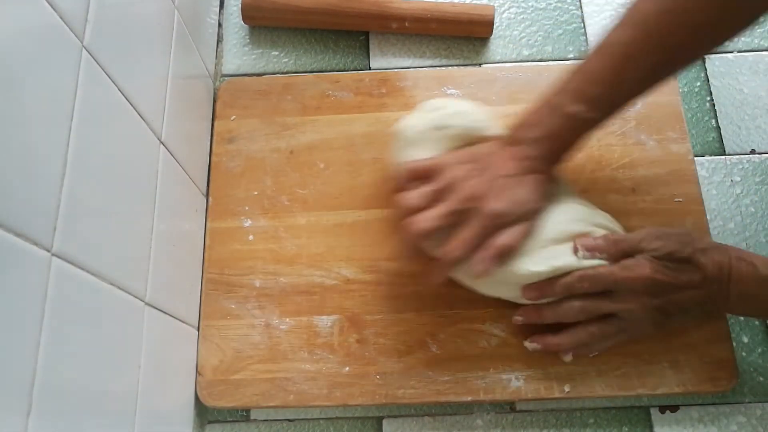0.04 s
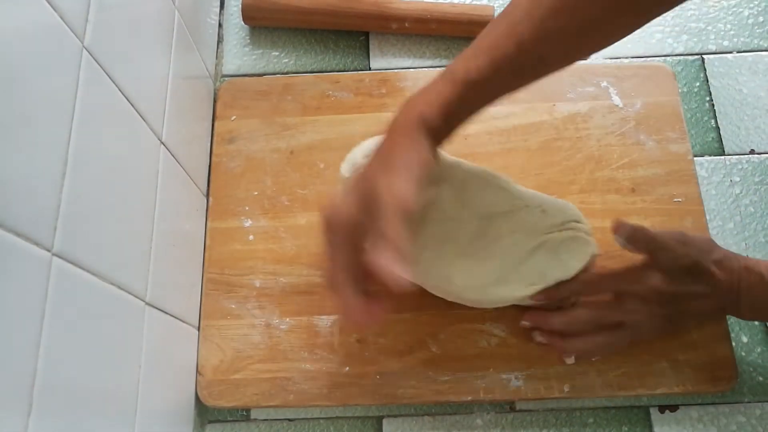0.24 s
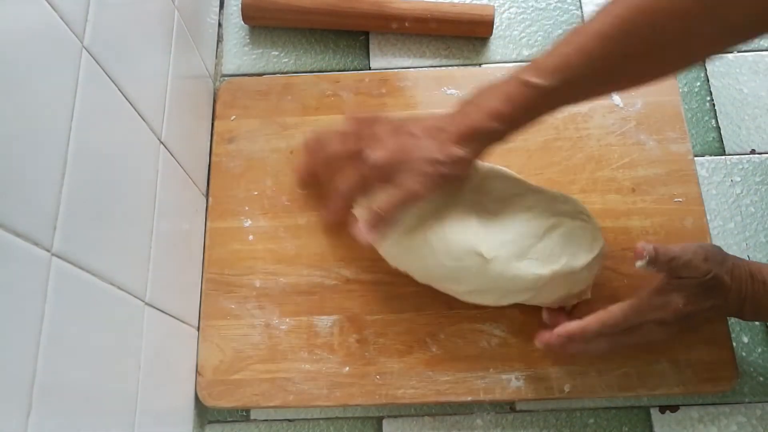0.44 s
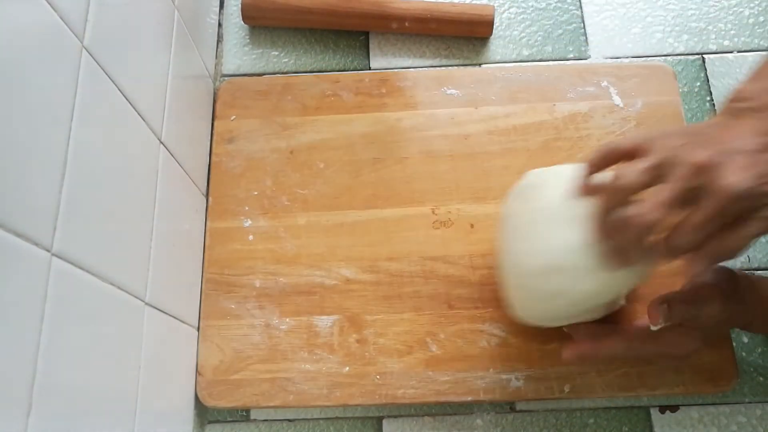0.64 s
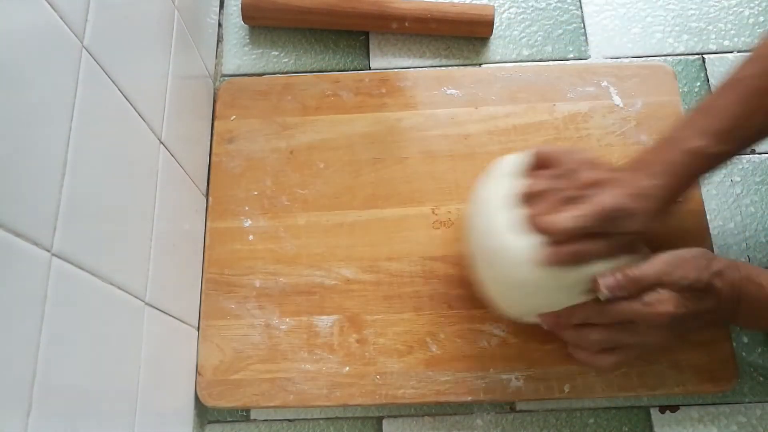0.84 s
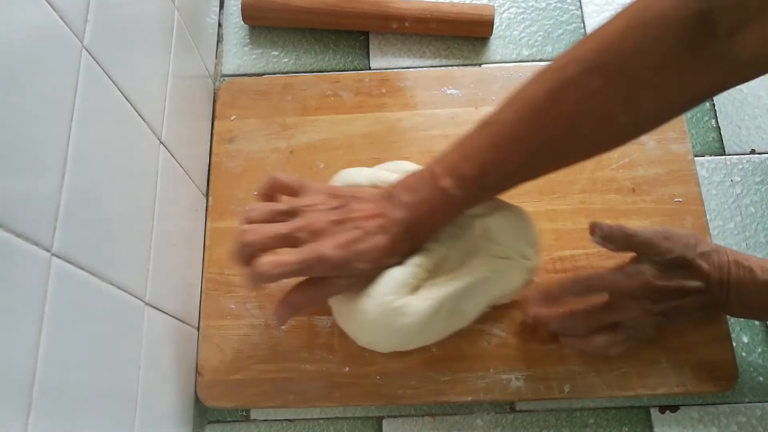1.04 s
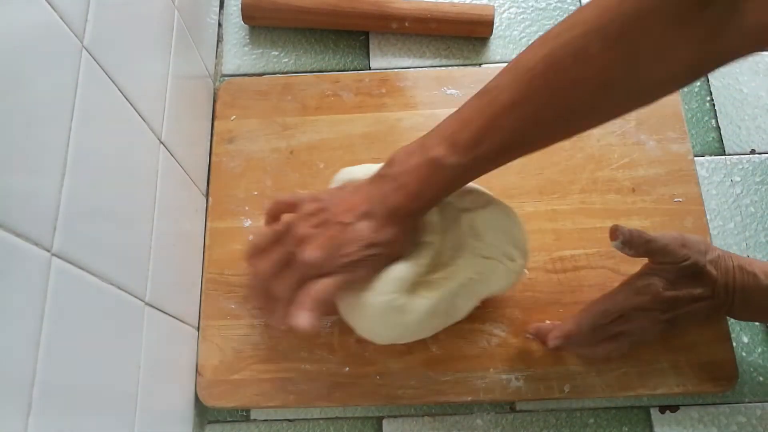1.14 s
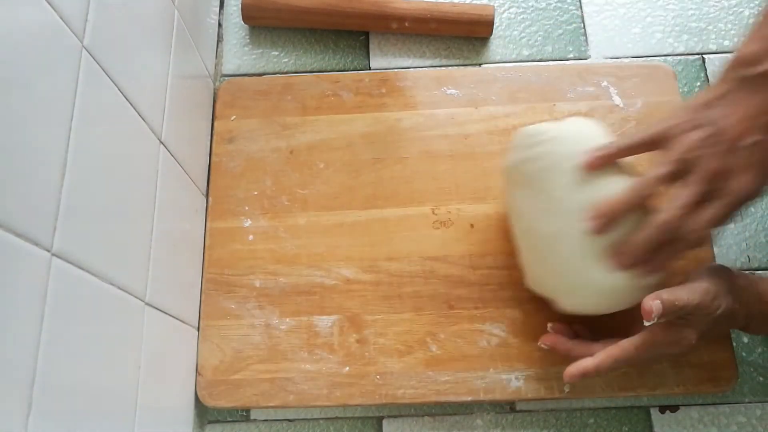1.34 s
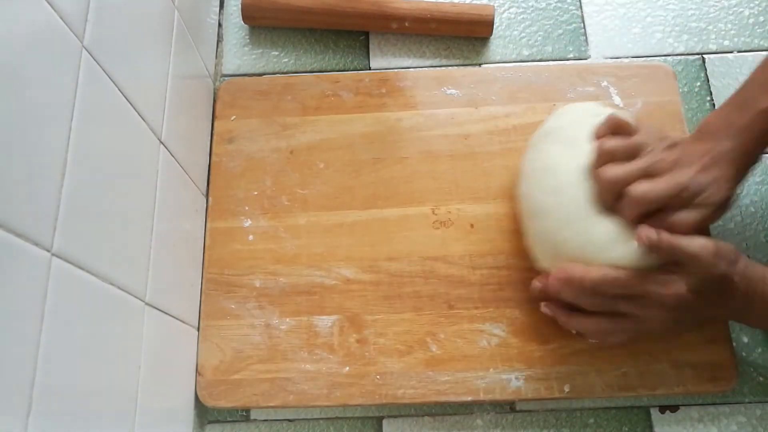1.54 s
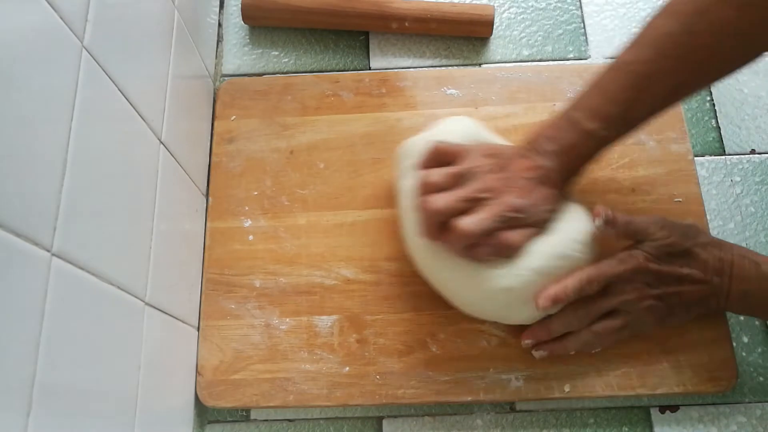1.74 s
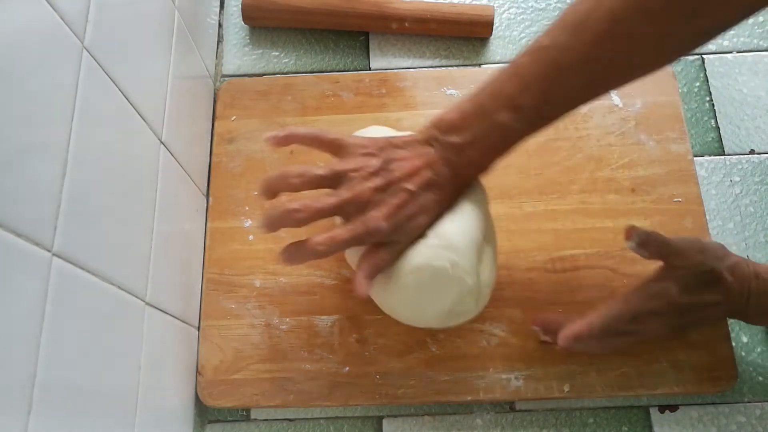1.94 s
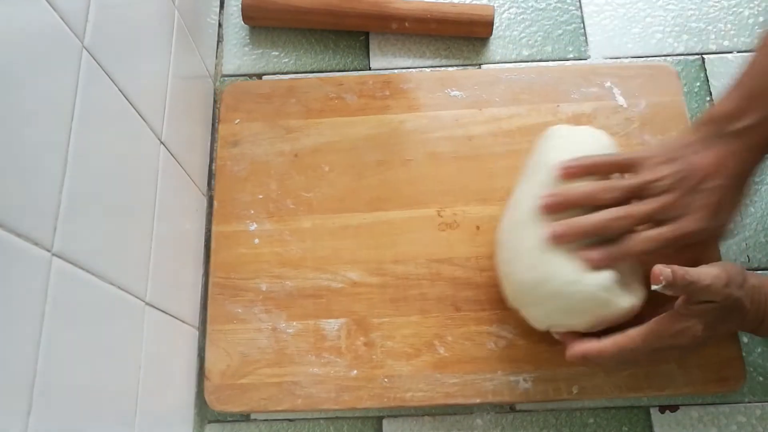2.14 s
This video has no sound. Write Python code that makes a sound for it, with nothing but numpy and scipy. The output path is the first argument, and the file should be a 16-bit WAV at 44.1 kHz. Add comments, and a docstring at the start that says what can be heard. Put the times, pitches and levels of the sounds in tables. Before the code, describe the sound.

Hands knead dough on a loose wooden board, with soft thumps and floury rubbing. The board knocks several times on the tiled worktop, then again a little later, before quiet kneading continues. Close microphones in a small kitchen.

```python
"""A small kitchen, close stereo microphones: hands knead dough on a loose wooden board by a tiled wall.
Over still air the board scrapes, a palm brushes it, and the dough thumps softly and hisses on the flour.
From 0.2 s a push rocks the board so that it knocks on the tiled worktop, and the room rings briefly.
A finger comes unstuck near 0.9 s, and near 1.2 s the board knocks again.
Quiet kneading goes on, ending in a faint rising squeak and a last scrape."""
import sys
import numpy as np
from scipy import signal
from scipy.fft import rfft, irfft
from scipy.io import wavfile

SR = 44100
rng = np.random.default_rng(int(sys.argv[2]) if len(sys.argv) > 2 else 0)


def file_out(sig):
    """Save sig as 16-bit WAV at sys.argv[1]."""
    # one column per channel
    cols = np.atleast_2d(sig).T
    # limit, then scale
    lim = np.clip(cols, -1, 1)
    pcm = np.round(lim * 32767).astype(np.int16)
    wavfile.write(sys.argv[1], SR, pcm)


N = 97020
TIME = np.arange(N) / SR


def from_db(db):
    """Decibels to gain."""
    return 10 ** (np.asarray(db) / 20)


def rms_one(x):
    """Scale to rms 1."""
    return x / np.sqrt(np.mean(x ** 2) + 1e-20)


def pan(db):
    """Gains at the two microphones; pan is left minus right in dB."""
    return from_db(np.array([[db], [-db]]) / 2)


def at_hz(points, hz):
    """Read a table on a log-frequency axis."""
    f, values = np.transpose(points)
    return np.interp(np.log(hz), np.log(f), values)


def band(x, low, high, order=2):
    """Butterworth band-pass, edges in Hz."""
    sos = signal.butter(order, [low, min(high, .49 * SR)], "band", fs=SR, output="sos")
    return signal.sosfilt(sos, x + 1e-18)


def convolve(x, response):
    """Pass a sound through an impulse response."""
    return signal.fftconvolve(np.atleast_2d(x), np.atleast_2d(response), axes=-1)[:, :N]


def click(s):
    """A unit impulse at s seconds."""
    return 1. * (np.arange(N) == int(s * SR))


def ring(hz, t60, lag=0):
    """One dying mode."""
    age = np.maximum(TIME - lag, 0)
    return np.sin(2 * np.pi * hz * age) * from_db(-60 * age / t60)


def hiss(spectrum):
    """Fine friction noise, unrelated in the two channels; rms 1."""
    hz = np.maximum(np.arange(N // 2 + 1) * SR / N, 1)
    coloured = irfft(rfft(rng.standard_normal((2, N))) * from_db(at_hz(spectrum, hz)), N)
    return rms_one(band(coloured, 1200, 20000))


def resonate(x, modes):
    """Drive broad resonances in parallel; rms 1."""
    return rms_one(sum(from_db(db) * rms_one(band(x, hz - width / 2, hz + width / 2))
                       for hz, width, db in modes))


def swell(s, rise, fall, db, pan_db=0):
    """Stereo bell-shaped envelope of one hand movement."""
    width = np.where(TIME < s, rise, fall)
    return from_db(db) * pan(pan_db) * np.exp(-.5 * ((TIME - s) / width) ** 2)


def strokes(rows):
    """Joint envelope of several movements."""
    return np.sqrt(sum(swell(*row) ** 2 for row in rows))


# Likeness of the room's sound at the two microphones: f/Hz, likeness/0-1
MIC_LIKENESS = [(60, .999), (130, 0.94), (260, 0.9), (500, 0), (1000, 0.7), (2000, 0.19), (4000, 0),
                (12000, 0.048)]
# Its lean, mostly to the right: f/Hz, pan/dB
ROOM_LEAN = [(100, -0.5), (260, 1), (500, -4.5), (1200, -1.5), (4000, -1.5), (8500, -13.5), (15000, -14)]
def diffuse_bands():
    """Third-octave bands of noise from all round the room, alike in the bass, unrelated in the treble."""
    edges = 22 * 2 ** (np.arange(30) / 3)
    white = rng.standard_normal((2, 2, N))
    for k, (low, high) in enumerate(zip(edges, edges[1:])):
        mid, side = band(white[k % 2], low, high)
        hz = np.sqrt(low * high)
        alike = at_hz(MIC_LIKENESS, hz)
        noise = np.sqrt(1 + alike) * mid + np.sqrt(1 - alike) * side * [[1], [-1]]
        yield hz, noise * pan(at_hz(ROOM_LEAN, hz))


# Room tone all round the microphones: f/Hz, relative level/dB
AIR_SPECTRUM = [(25, 7), (50, -1.5), (72, -5.5), (100, 4.5), (126, -9), (205, -5.5), (260, -9),
                (380, -17.5), (700, -22), (1250, -19), (1900, -27.5), (3700, -26), (7600, -41),
                (11500, -32.5), (15800, -60)]
def still_air(level_db=-65):
    """Low steady rumble and faint hiss of the kitchen."""
    noise = sum(noise * from_db(at_hz(AIR_SPECTRUM, hz)) for hz, noise in diffuse_bands())
    return from_db(level_db) * rms_one(noise)


# Scrapes on the worktop, right of centre: peak t/s, rise/s, fall/s, level/dB, pan/dB
SCRAPE_STROKES = [(0.0, .02, 0.041, -68.5, -6.5), (.56, .04, 0.057, -67, -6),
                  (2.2, 0.041, 0.059, -62.5, -6.5)]
# Resonances of wood sliding on tile: f/Hz, width/Hz, relative level/dB
SCRAPE_RESONANCES = [(393.5, 90, -7), (896, 250, 0.5), (1092, 100, -4), (1590, 280, 0.5), (2170, 150, -6),
                     (4060, 1300, -5), (5130, 1600, -5)]
def board_scrapes(slips_per_s=2500):
    """The board slides on the tiles in tiny dense slips."""
    slips = (rng.random((2, N)) < slips_per_s / SR) * rng.standard_normal((2, N))
    return strokes(SCRAPE_STROKES) * resonate(slips + slips.mean(axis=0), SCRAPE_RESONANCES)


# A palm brushes the board, to the left: peak t/s, rise/s, fall/s, level/dB, pan/dB
PALM_STROKES = [(.01, .04, 0.082, -65, 3), (.95, .055, 0.11, -76, 2), (1.49, 0.086, 0.036, -78, 3),
                (1.8, 0.051, .045, -67.5, 7.5)]
# Hiss of skin on wood: f/Hz, relative level/dB
PALM_SPECTRUM = [(2000, -7), (5000, -36), (8500, -12), (11200, 1.5), (13200, -7), (15100, 14), (15800, -4)]
# Dough drags over the flour, to the right: peak t/s, rise/s, fall/s, level/dB, pan/dB
DOUGH_STROKES = [(.08, 0.031, .11, -56, -4), (.25, 0.032, 0.04, -54.5, -9.5),
                 (.495, 0.021, 0.03, -54.5, -10), (.57, .04, 0.059, -67.5, -7.5),
                 (1.06, 0.055, .03, -67, -10), (1.205, .025, 0.02, -61, -8),
                 (1.83, 0.084, 0.092, -62.5, -9), (2.2, 0.051, 0.055, -59, -6.5)]
# Hiss of dough on flour: f/Hz, relative level/dB
DOUGH_SPECTRUM = [(1500, -12), (2700, -15.5), (4000, -13), (7000, -11), (8500, -8.5), (10000, -2),
                  (11500, 4), (13000, -9), (15800, 5.5)]
def rubbing(grain_db=1.5):
    """Skin and dough slide over floury wood with a slightly grainy hiss."""
    grain = from_db(grain_db * rms_one(band(rng.standard_normal(N), 15, 300)))
    dough = strokes(DOUGH_STROKES) * hiss(DOUGH_SPECTRUM)
    palm = strokes(PALM_STROKES) * hiss(PALM_SPECTRUM)
    return grain * (palm + dough)


# The hand presses down, midway between the microphones: peak t/s, rise/s, fall/s, level/dB
PRESS_STROKES = [(.05, 0.15, 0.098, -56.5), (.3, 0.045, 0.067, -60.5), (.45, .06, 0.066, -53),
                 (.67, 0.014, 0.038, -63), (1.07, 0.052, 0.028, -61.5), (1.245, 0.019, 0.058, -50.5),
                 (1.48, 0.019, 0.01, -61), (1.84, 0.046, 0.044, -56), (1.995, 0.012, 0.038, -63),
                 (2.2, .06, 0.046, -57.5)]
# The worktop under the board: f/Hz, width/Hz, relative level/dB
WORKTOP_MODES = [(72, 20, -4), (95.4, 11, -1), (146.66, 25, -5), (198, 25, -5), (231.9, 19, -7)]
def dough_presses():
    """Soft pushes through the dough stir the low resonances of the worktop."""
    rumble = resonate(rng.standard_normal(N + SR), WORKTOP_MODES)[SR:]
    return strokes(PRESS_STROKES) * rumble


def wood_knock(s, hz, width_hz=403, body_db=-13):
    """Soft wood meets tile: a knock around hz with a dull lower body, and little outside that range."""
    knock = band(click(s), hz - width_hz / 2, hz + width_hz / 2)
    body = from_db(body_db) * band(click(s), 340, 580, order=3)
    return band(knock - body, 210, 1730, order=4)


def hard_clack(s, lag_s=.0011):
    """The hard contact follows just after the first touch."""
    clack = band(click(s + lag_s), 1198, 1672, order=1)
    return band(clack, 797, 3750, order=5)


def flour_crunch(s, decay_s=.0015):
    """Flour crushed under the board gives a few milliseconds of grit."""
    age = np.maximum(TIME - s, 0) / decay_s
    burst = rng.standard_normal(N) * np.sqrt(age) * np.exp(-np.minimum(age, 60))
    unit_burst = burst / np.sqrt(np.sum(burst ** 2) + 1e-20)
    return band(unit_burst, 2300, 6100, order=3)


# Blows on the tiles, close by: t/s, knock f/Hz, knock level/dB, thud level/dB, clack level/dB,
# crunch level/dB, pan/dB, place along the board/0-1 (levels before filtering and overall gains)
BLOWS = [(0.208, 843, -6, -25, -10, -34.5, -9, 1), (0.2136, 906, 8, -12.5, -13.5, -21, -3, 0.39),
         (0.3527, 753, -37, -11.5, -29, -59.5, -1, 0.09), (0.3678, 1078, 16.5, -4, 8, -46, 0.5, .1),
         (0.4446, 526, -6.5, -10, -17, -35, -5.5, 0.7), (0.4490, 966, 3.5, -6, -26.5, -36, 2, 0.38),
         (1.1653, 930, -5.5, -31.5, -16, -32, -28.5, .2), (1.1732, 996, 10, 0, -38, -29.5, -4.5, 0.52),
         (1.2244, 913, -6.5, -12, -53, -46, -12.5, 0.76)]
# Modes of the wooden board: f/Hz, relative level/dB, t60/s, pan/dB
BOARD_MODES = [(400.6, -28, 0.26, 12.5), (516.5, -35.5, 0.29, 6), (657.6, -32, .04, -1.5),
               (756, -26, 0.073, -5.5), (808, -26.5, .2, -7.5), (943.7, -29, 0.065, -20),
               (1033.8, -27, 0.032, -25), (1157, -36.5, 0.0804, -14.5), (1290, -32, 0.02, 13),
               (1575, -23, 0.2, 9.5), (1920, -47, .06, -16), (1985, -43, 0.14, 0.5), (3027, -37, .05, -33),
               (3640, -43.5, .05, -16.5)]
def board_knocks(contact_db=5, ring_db=-20.5, place_depth_db=-4.5, flex_db=-21, flex_swell_s=.013):
    """Each blow is heard straight, rings the modes its place favours and sets the whole board flexing."""
    lag_s = np.array([[.0003], [0]])  # the ringing reaches the left microphone later
    rings = np.array([from_db(db + ring_db) * pan(pan_db) * ring(hz, t60, lag_s)[:, :SR // 3]
                      for hz, db, t60, pan_db in BOARD_MODES])
    knocks, thuds = 0, 0
    for s, hz, knock_db, thud_db, clack_db, crunch_db, pan_db, place in BLOWS:
        force = from_db(knock_db) * wood_knock(s, hz)
        force += from_db(clack_db) * hard_clack(s)
        force += from_db(crunch_db) * flour_crunch(s)
        shares = from_db(place_depth_db * np.cos(np.pi * place * np.arange(len(BOARD_MODES))))
        ringing = convolve(force, np.tensordot(shares, rings, 1))
        knocks += pan(pan_db) * (from_db(contact_db) * force + ringing)
        thuds += from_db(thud_db) * click(s)
    onset = 1 - np.exp(-(TIME / flex_swell_s) ** 2)
    flex = from_db(flex_db) * ring(hz=265.5, t60=.092) * onset
    return knocks + convolve(thuds, flex)


# Echoes off the tiles near the microphones: delay t/s, level/dB, pan/dB
TILE_ECHOES = [(.00078, -19.5, 22), (.0029, -8.5, -8), (.0062, -20.5, -11), (0.0103, -14, 1)]
# Tail from farther round the kitchen: f/Hz, relative level/dB
TAIL_SPECTRUM = [(100, -50), (270, -6.5), (450, 2), (800, -4), (1500, -0.5), (3000, -1), (6000, 2.5),
                 (12000, -23)]
# Its decay: f/Hz, t60/s
TAIL_DECAY = [(100, 0.63), (500, 0.25), (900, 0.13), (1600, 0.32), (4000, .42), (12000, 0.15)]
def kitchen_reverb(x, tail_db=-34.5, build_s=.0031):
    """Echoes from the near tiles, then a diffuse tail that dies band by band."""
    tail = sum(noise * from_db(at_hz(TAIL_SPECTRUM, hz) - 60 * TIME / at_hz(TAIL_DECAY, hz))
               for hz, noise in diffuse_bands())
    tail *= from_db(tail_db) * pan(-.5) * (1 - np.exp(-TIME / build_s))
    echoes = sum(from_db(db) * pan(pan_db) * click(delay) for delay, db, pan_db in TILE_ECHOES)
    return convolve(x.mean(axis=0), tail + echoes)


def wall_dip(x, share=.16):
    """The close wall on the left cancels part of the low middle at the left microphone."""
    return x - np.array([[share], [0]]) * band(x, 570, 590, order=1)


def sticky_tick(s=.9425, gain_db=-23):
    """A small snap as a finger comes unstuck from the dough."""
    return from_db(gain_db) * band(click(s), 1710, 2320)


# A faint squeak of skin, on both microphones: t/s, f/Hz, level/dB
SQUEAK_GLIDE = [(2.028, 1490, -92), (2.075, 1520, -63.5), (2.12, 1590, -74), (2.2, 1630, -76)]
def skin_squeak(width_hz=130):
    """Skin squeaks faintly: a narrow band of noise that rises in pitch."""
    s, hz, db = np.transpose(SQUEAK_GLIDE)
    lowpass = signal.butter(2, width_hz / 2, fs=SR, output="sos")
    waver = rms_one(signal.sosfilt(lowpass, rng.standard_normal((2, N))))
    tone = np.sin(2 * np.pi * np.cumsum(np.interp(TIME, s, hz)) / SR)
    envelope = from_db(np.interp(TIME, s, db)) * (TIME > s[0])
    return waver * tone * envelope


def scene():
    """Knocks and snap ring in the kitchen; the quiet handling reaches the microphones directly."""
    impacts = board_knocks() + sticky_tick()
    in_room = wall_dip(impacts + kitchen_reverb(impacts))
    return in_room + rubbing() + dough_presses() + board_scrapes() + skin_squeak() + still_air()


def record(dry):
    """The microphone signal is cut steeply above 15.5 kHz."""
    return signal.sosfilt(signal.ellip(12, .1, 80, 15500, fs=SR, output="sos"), dry)


dry = scene()
out = record(dry)
file_out(out)
```